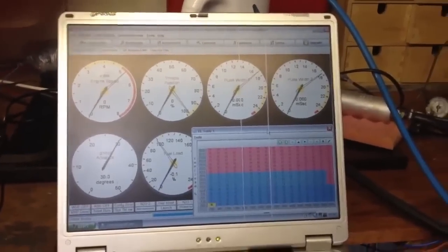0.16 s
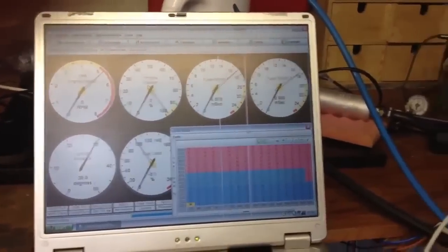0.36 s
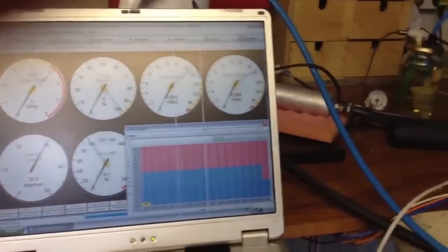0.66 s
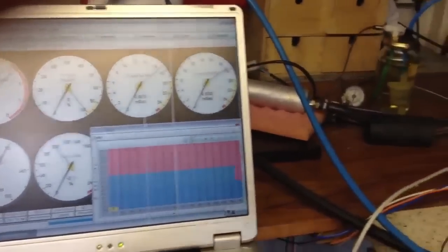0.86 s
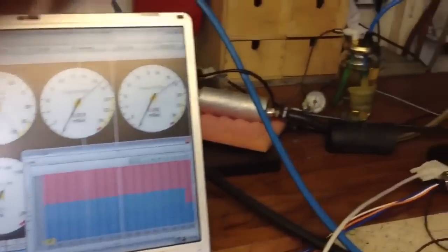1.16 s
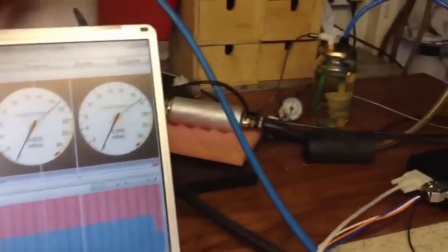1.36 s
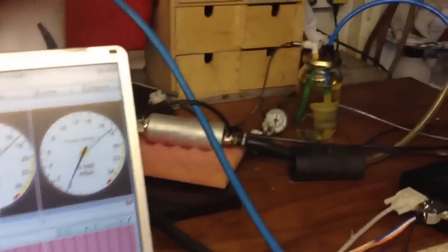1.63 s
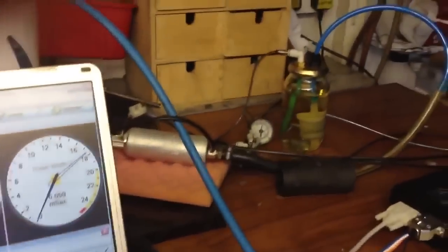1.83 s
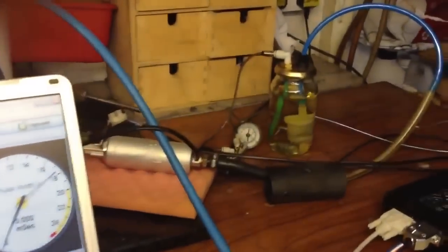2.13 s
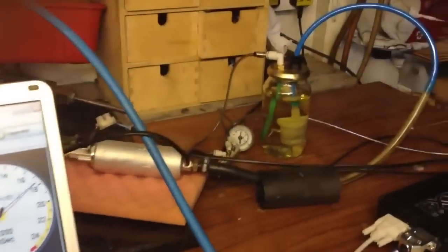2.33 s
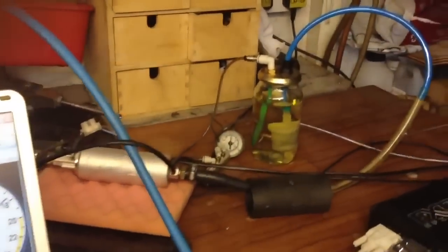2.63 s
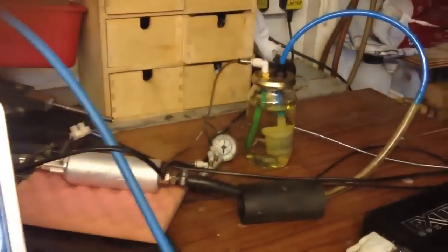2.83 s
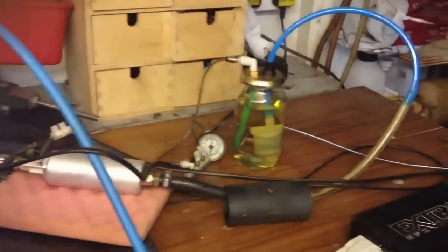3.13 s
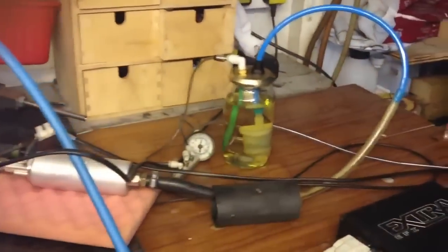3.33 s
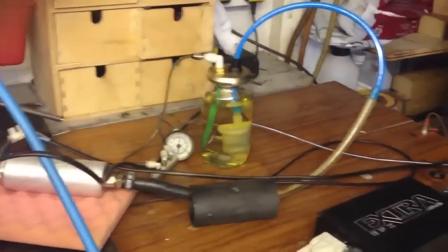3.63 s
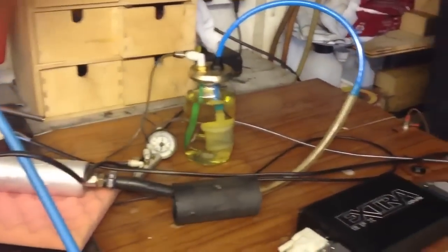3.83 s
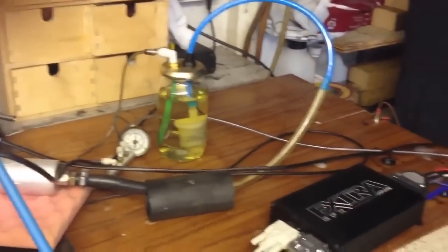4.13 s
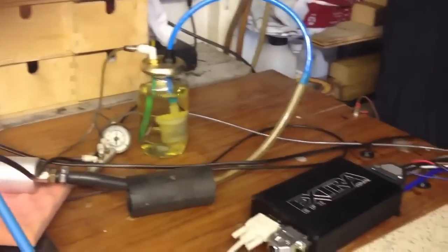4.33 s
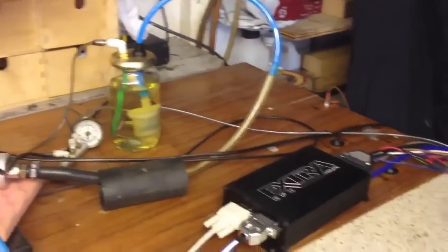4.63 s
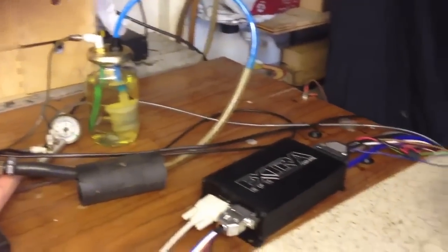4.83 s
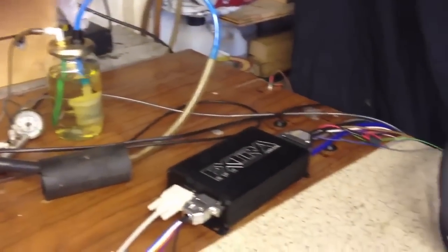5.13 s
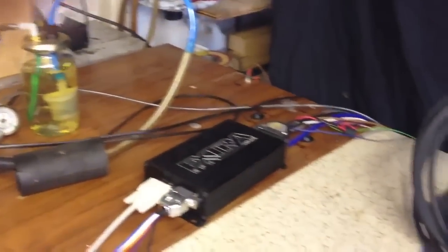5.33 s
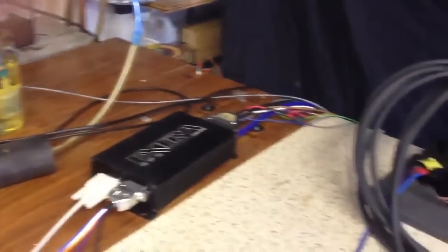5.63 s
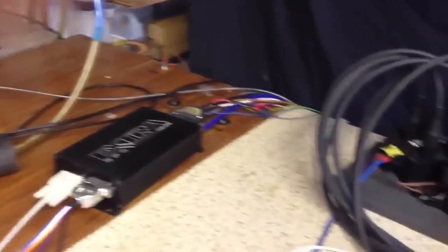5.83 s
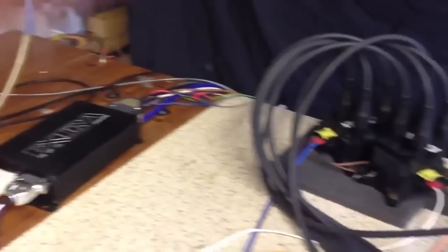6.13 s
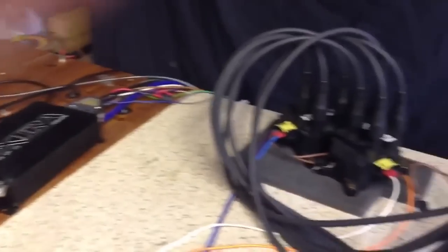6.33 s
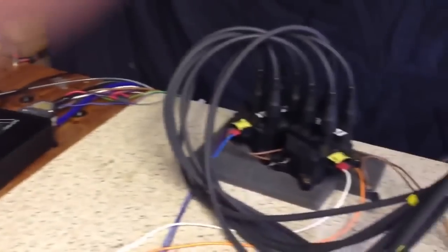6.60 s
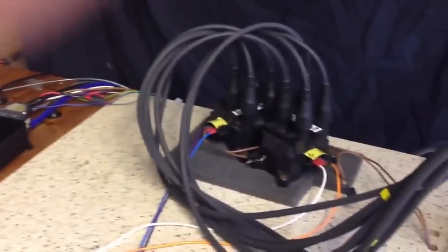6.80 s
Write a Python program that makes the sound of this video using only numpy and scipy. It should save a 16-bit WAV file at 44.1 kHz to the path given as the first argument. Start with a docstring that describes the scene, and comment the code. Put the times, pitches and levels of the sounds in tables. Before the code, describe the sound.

A small electric fuel pump runs without pause on a workshop bench. A thin, slightly wavering high whine sits with a rough, bright hiss of brushes and fuel. The whine stutters briefly early on, strengthens, then fades behind the hiss. Faint hum, a throbbing low drone and soft room rush lie underneath, with two dull bumps. A small handheld microphone drifts past at close range, in a short, cluttered room echo.

```python
"""A high whine and a rough hiss stand out: a small electric fuel pump running on a workshop bench.
Its shaft turns about 105 times a second; eight commutator segments make the whine as harmonics
and chop the noise of brushes and fuel into a rough hiss. The turning parts add a faint rattle.
The microphone drifts slowly past, so parts of the sound swell and fade; echoes color them.
Underneath lie mains hum, a throbbing drone, the low rush of the room and two soft bumps."""
import sys
import numpy as np
from scipy import signal
from scipy.fft import rfft, irfft
from scipy.io import wavfile

SR = 44100
rng = np.random.default_rng(int(sys.argv[2]) if len(sys.argv) > 2 else 0)


def persist_wave(psi):
    """Save psi, clipped to +-1, as 16-bit WAV."""
    counts = np.round(np.clip(psi, -1, 1) * 32767).astype(np.int16)
    wavfile.write(sys.argv[1], SR, np.atleast_2d(counts).T)


N = 306936
T = np.arange(N) / SR  # time of each sample, s
BINS = np.fft.rfftfreq(N, 1 / SR)  # frequencies of the spectrum, Hz

# Trend of the shaft speed, with stumbles under the load: (t/s, speed/turns per s)
SHAFT_SPEED = [(0, 105.4), (0.2, 104.1), (0.95, 104.7), (1.12, 103.4), (1.22, 105.9), (1.35, 104.7),
               (2.5, 104.6), (3.92, 105.4), (4.01, 103.6), (4.11, 105.4), (4.48, 104.2), (4.65, 104.9),
               (6.6, 105.3), (6.68, 104.2), (6.82, 106.0), (6.96, 104.7)]
# Main whine, at twice the segment rate, before the effect of speed: (t/s, level/dB)
WHINE_LEVEL = [(0, -47), (0.9, -51.5), (1.15, -50), (1.23, -47.5), (1.36, -52.5), (1.55, -51.5),
               (1.73, -45), (2.1, -43), (3.05, -48), (3.16, -53.5), (3.5, -56.5), (3.64, -49),
               (3.93, -48.5), (3.98, -59), (4.3, -59), (5.75, -61), (6.2, -53.5), (6.96, -52)]
# The commutator's other harmonics: multiples of the segment rate
SEGMENT_MULTIPLES = [1, 3, 4, 5, 7, 8]
# Beam and echo of each of those harmonics, in the same order, before a small trim and flutter:
# (level outside the beam/dB, swell/dB, crossed at t/s, approach/s, retreat/s,
#  echo level/dB, first node at t/s, time between nodes/s); a negative swell is a quiet zone
HARMONIC_BEAMS = [(-64.5, -20, 0.38, 3.0, 0.45, -75, 2.14, 3.15),
                  (-53, -10.5, 2.3, 2.7, 0.82, -71, 0.25, 1.43),
                  (-61, 10.5, 3.47, 0.44, 2.05, -73, 1.11, 1.52),
                  (-55, 11.5, 5.9, 1.25, 0.58, -65, 1.21, 1.59), (-52.5, -15, 2, 0.4, 3.1, -63, 0.7, 2.1),
                  (-56.5, -7, 5.6, 0.65, 0.81, -63, 1.1, 1.09)]
# Further lines, some of them higher commutator harmonics: (multiple of the shaft speed, level/dB)
SHAFT_ORDERS = [(4, -68.5), (9, -82), (13, -68), (15, -72), (17, -74), (18, -78), (20, -70.5), (25, -66),
                (33, -80), (39, -67), (41, -76), (48, -61.5), (72, -62), (80, -62)]

# Beams of the five hiss layers, before spurt and brush contact:
# (level outside the beam/dB, swell/dB, crossed at t/s, approach/s, retreat/s)
FLOW_BEAM = (-54.0, 2.5, 1.9, 0.6, 3.5)
BUZZ_BEAM = (-56.5, 9.5, 5, 2.5, 1.9)
RASP_BEAM = (-46.5, 2.5, 3, 1, 2.5)
RING_BEAM = (-53, 9, 2.5, 1.67, 3)
FIZZ_BEAM = (-55.5, 10, 4.5, 3.5, 3.5)
# Spectrum shapes of the same five layers, before the casing: (f/Hz, relative level per Hz/dB)
FLOW_SPECTRUM = [(500, -25.5), (800, -2), (1150, -6.5), (1450, 2), (1850, 1), (2400, 0), (2650, 1),
                 (2950, -5), (3400, 2), (4500, -25), (8000, -40.5)]
BUZZ_SPECTRUM = [(2200, -19), (2850, -14), (3100, -9.5), (3400, -1.5), (3800, -1), (4100, 3.5), (4450, 4.5),
                 (4900, 3), (6000, -37)]
RASP_SPECTRUM = [(1000, -40), (3600, -14), (4000, -6.5), (4300, -1), (4550, -8.5), (4900, -2), (5350, -4.5),
                 (5900, 0), (6800, -3), (7600, -4.5), (9000, -32), (12000, -23)]
RING_SPECTRUM = [(4000, -36.5), (6300, -11), (7200, -6.5), (7900, 0), (8600, -2), (9400, -3.5),
                 (9700, -11.5), (11500, -21)]
FIZZ_SPECTRUM = [(5000, -36), (8500, 4.5), (10000, 8), (11300, 2), (12500, 3), (14000, 4), (15000, 9),
                 (16000, -10)]
# Resonances and dips of the pump casing: (f/Hz, width/Hz, level added to the hiss/dB)
CASING_RESONANCES = [(1372, 75, 8), (1406, 68, -4.5), (2397, 170, 4), (4225, 200, -0.5), (4850, 100, 4),
                     (5060, 160, -1), (5700, 140, 3), (6330, 370, -3.5), (6500, 240, 4.5), (7660, 1200, -1),
                     (8730, 250, 0.5), (10050, 300, 0.5)]
# Spectrum shape of the rattle: (f/Hz, relative level per Hz/dB)
RATTLE_SPECTRUM = [(100, -24), (400, -23), (900, -7), (1300, -5.5), (1600, -11), (2500, -1.0),
                   (3000, -7), (3800, 1), (4600, 11), (7000, 17), (12000, -2)]

# Band of hiss and rattle weakened by the echo off the bench: (t/s, f/Hz, depth/0-1)
BENCH_NOTCH = [(0, 3150, 0.27), (1.9, 3680, 0.05), (2.5, 6000, 0.1), (3.2, 5930, 0.5), (4.3, 6200, 0.23),
               (4.8, 7060, 0.5), (6.96, 7750, 0.14)]
# Band strengthened by that echo: (t/s, f/Hz, added share of amplitude)
BENCH_PEAK = [(0, 6400, 0.66), (1.1, 6000, 0.28), (1.4, 8240, 0.19), (2.6, 7850, 0.88), (3.3, 7720, 0.98),
              (4.5, 7930, 0.18), (5.7, 8460, 0.99), (6.96, 8500, 0.05)]

# Soft bumps: (t/s, peak level of the envelope/dB)
BUMP_TIMES = [(2.96, -60), (4.31, -61)]
# Low rush of the room, with a brief swell: (t/s, level/dB)
RUSH_LEVEL = [(0, -64), (0.9, -61), (1.45, -56.5), (1.85, -60.5), (6.96, -61.5)]
# Spectrum shape of that rush: (f/Hz, relative level per Hz/dB)
ROOM_SPECTRUM = [(20, -34), (60, -45), (110, -10.5), (150, -9), (190, 1), (260, 0), (320, 3.5), (420, 0),
                 (540, 0), (640, -8), (1000, -7.5), (2000, -21)]
# Hum of the bench equipment: (f/Hz, level/dB)
HUM_LINES = [(100, -79), (186, -81.5), (300, -70), (399.6, -71.5), (449.5, -83), (499.6, -71.5)]

SEGMENTS = 8  # on the commutator
HUNT_TURNS_PER_S, HUNT_HZ = 0.3314, 4.0  # the motor hunts around its trend: rms amount, average rate
WHINE_DB_PER_TURN = 1.5  # on the flank of a resonance, each turn a second faster makes the whine louder
SCATTER_DB, SCATTER_HZ = -60.5, 15  # copy of the whine scattered by the room: level, flutter rate
FLUTTER_DB, FLUTTER_HZ = 1.0, 12  # chance flutter of the other harmonics: rms depth, rate
# The main whine stutters as the motor recovers from a stumble: center, half-length, rate, depth
STUTTER_AT_S, STUTTER_S, STUTTER_PER_S, STUTTER_DEPTH = 1.262, 0.16, 17.3, 0.99
SPURT_AT_S, SPURT_S, SPURT_DB = 4.63, 0.038, 5.5  # brief spurt in the flow of fuel
EDGE_HZ = 15450  # upper limit of the rattle and of the recorder


def motor_speed():
    """Turns a second: the load sets the trend, and the motor hunts unevenly around it with fine jitter."""
    hunt_depth = 1 + 0.396 * wander(rate_hz=1.508)
    hunt_cycles = HUNT_HZ * T + 0.3 * wander(rate_hz=1.5)
    hunt = hunt_depth * np.sin(2 * np.pi * hunt_cycles)
    jitter = 0.071 * wander(rate_hz=33.6)
    return follow(SHAFT_SPEED)[0] + HUNT_TURNS_PER_S * evened(hunt) + jitter


def whine(shaft, speed, trim_db=-0.07):
    """Commutator harmonics, plus further lines at multiples of the shaft speed, some also harmonics."""
    segment = SEGMENTS * shaft
    main_db = follow(WHINE_LEVEL)[0] + WHINE_DB_PER_TURN * (speed - speed.mean())
    main = stutter() * harmonic(2 * segment, main_db, unrest=0.14, rate_hz=36)
    others = 0
    for multiple, row in zip(SEGMENT_MULTIPLES, HARMONIC_BEAMS):
        level_db = trim_db + standing_wave(*row) + FLUTTER_DB * wander(FLUTTER_HZ)
        others = others + tone(multiple * segment, level_db, unrest=0.18, rate_hz=25)
    orders = sum(tone(order * shaft, db, unrest=0.81, rate_hz=4.5) for order, db in SHAFT_ORDERS)
    return main + others + orders


def harmonic(turns, db, unrest, rate_hz):
    """The direct whine beats with its scattered copy, so it flutters most when it is weak."""
    flutter = wander(SCATTER_HZ) + 1j * wander(SCATTER_HZ)
    scattered = flutter * np.exp(2j * np.pi * turns)
    return tone(turns, db, unrest, rate_hz) + gain_of(SCATTER_DB) * scattered.real


def stutter():
    """A brief run of evenly spaced dropouts, as a gain."""
    gaps = np.cos(np.pi * STUTTER_PER_S * (T - STUTTER_AT_S)) ** 4
    return 1 - np.clip(STUTTER_DEPTH, 0, 1) * bell(STUTTER_AT_S, STUTTER_S, STUTTER_S) * gaps


def standing_wave(outside_db, swell_db, at_s, approach_s, retreat_s, echo_db, node_s, spacing_s):
    """Level in dB as a beam and its echo cancel and reinforce in turn along the microphone's path."""
    direct = gain_of(beam(outside_db, swell_db, at_s, approach_s, retreat_s))
    echo = gain_of(echo_db) * np.exp(2j * np.pi * (T - node_s) / spacing_s)
    return 20 * np.log10(abs(direct - echo) + 1e-9)


def brushes(shaft):
    """Noise of brushes and fuel, chopped by each segment and a little by each turn, ringing in the casing."""
    angle = 2 * np.pi * shaft
    segment_chop_db = 1.7 * np.cos(SEGMENTS * angle) + 0.55 * np.cos(2 * SEGMENTS * angle)
    turn_chop_db = 0.53 * np.cos(angle) + 0.17 * np.cos(2 * angle)
    chop = gain_of(segment_chop_db + turn_chop_db + 0.39 * wander(rate_hz=19))
    casing_db = sum(db / (1 + (2 * (BINS - hz) / width) ** 2) for hz, width, db in CASING_RESONANCES)
    spurt_db = SPURT_DB * bell(SPURT_AT_S, SPURT_S, SPURT_S)
    contact = wander(rate_hz=24)  # uneven brush contact shows most in the top of the hiss
    layers = [(beam(*FLOW_BEAM) + spurt_db, FLOW_SPECTRUM),
              (beam(*BUZZ_BEAM), BUZZ_SPECTRUM),
              (beam(*RASP_BEAM), RASP_SPECTRUM),
              (beam(*RING_BEAM) + 0.13 * contact, RING_SPECTRUM),
              (beam(*FIZZ_BEAM) + 0.86 * contact, FIZZ_SPECTRUM)]
    hiss = 0
    for db, spectrum in layers:
        chopped = chop * rng.standard_normal(N)
        hiss = hiss + gain_of(db) * coloured(chopped, spectrum, casing_db)
    return hiss


def rattle(shaft, size=1024, db=-54.0):
    """Each turn repeats the same scrapes of rotor and bearings: faint lines at multiples of shaft speed."""
    hz = np.arange(size // 2 + 1) * np.mean(np.diff(shaft)) * SR
    random_phases = np.exp(2j * np.pi * rng.random(len(hz)))
    one_turn = irfft(random_phases * (hz < EDGE_HZ))
    scrape = np.interp(shaft % 1, np.arange(size) / size, one_turn, period=1)
    return gain_of(db) * coloured(scrape, RATTLE_SPECTRUM)


def beam(outside_db, swell_db, at_s, approach_s, retreat_s):
    """Level in dB while the microphone crosses one beam of the pump's sound."""
    return outside_db + swell_db * bell(at_s, approach_s, retreat_s)


def bench_echo(x):
    """The bench's echo weakens one band and strengthens another; both slide as the microphone moves."""
    notch_hz, depth = follow(BENCH_NOTCH)
    peak_hz, boost = follow(BENCH_PEAK)
    notch = np.clip(depth, 0, 1) * sliding_band(x, notch_hz, width_hz=1020)
    return x - notch + boost * sliding_band(x, peak_hz, width_hz=450)


def sliding_band(x, hz, width_hz):
    """A resonance that follows the curve hz: shift it to zero, smooth, shift back."""
    turn = np.exp(2j * np.pi * np.cumsum(hz) / SR)
    r = np.exp(-np.pi * width_hz / SR)
    return 2 * (turn * signal.lfilter([1 - r], [1, -r], x / turn)).real


def clutter(x, strength=0.14, drift_s=.00005, count=6):
    """Echoes off nearby objects; their paths change as the hand moves, so fine ripples slide along."""
    echoes = 0
    for delay_s in rng.uniform(0.000984, .007, count):
        moving_delay = delay_s + drift_s * wander(rate_hz=0.37)
        echoes = echoes + np.interp(T - moving_delay, T, x, left=0)
    return x + strength * echoes


def reflections(x, t60_s=0.071, drift_s=0.000297):
    """Short, dense echoes from the cluttered walls; their delay drifts as the microphone moves."""
    t = T[:SR // 3]
    taps = rng.standard_normal(len(t)) * gain_of(-60 * t / t60_s) * (t > .003)
    wet = signal.fftconvolve(x, taps / np.linalg.norm(taps))[:N]
    return np.interp(T - drift_s * wander(rate_hz=0.519), T, wet, left=0, right=0)


def bumps(hz=165, rise_s=0.012):
    """Dull knocks: a low tone swells quickly and dies away within about a tenth of a second."""
    total = 0
    for start_s, db in BUMP_TIMES:
        age = np.maximum(T - start_s, 0)
        envelope = age / rise_s * np.exp(1 - age / rise_s)
        total = total + gain_of(db) * envelope * np.sin(2 * np.pi * hz * age)
    return total


def workshop(throb_hz=4.2):
    """Low rush, gently wavering hum and a drone near 225 Hz that throbs a few times a second."""
    rush = gain_of(follow(RUSH_LEVEL)[0]) * coloured(rng.standard_normal(N), ROOM_SPECTRUM)
    hum = sum(tone(hz * T, db, unrest=0.36, rate_hz=1.8) for hz, db in HUM_LINES)
    throb_cycles = throb_hz * T + 0.31 * wander(rate_hz=1.33)
    throb = 1 + 0.58 * np.cos(2 * np.pi * throb_cycles)
    drone_turns = 224.5 * T + 0.15 * wander(rate_hz=5.5)
    drone = throb * tone(drone_turns, -69.5, unrest=0.17, rate_hz=3.7)
    return rush + hum + drone


def tone(turns, db, unrest, rate_hz):
    """A line of given rms level whose strength and phase flutter; turns counts its cycles."""
    flutter = 1 + unrest * (wander(rate_hz) + 1j * wander(rate_hz))
    wave = flutter * np.exp(2j * np.pi * (turns + rng.random()))
    return gain_of(db) * evened(wave.real)


def coloured(x, points, extra_db=0):
    """Gives x a spectrum, at an rms of one."""
    hz, db = np.transpose(points)
    shape_db = np.interp(np.log(BINS + 1), np.log(hz), db) + extra_db
    return evened(irfft(rfft(x) * gain_of(shape_db), N))


def wander(rate_hz):
    """Smooth chance movement up to about this rate, at an rms of one."""
    smoothing = 1 + (BINS / rate_hz) ** 4
    return evened(irfft(rfft(rng.standard_normal(N)) / smoothing, N))


def bell(at_s, approach_s, retreat_s):
    """Rises smoothly to one at a moment and falls away again."""
    side_s = np.where(T < at_s, approach_s, retreat_s)
    return np.exp(-((T - at_s) / side_s) ** 2)


def follow(rows):
    """Each column of a curve, at every sample."""
    s, *columns = np.transpose(rows)
    return [np.interp(T, s, column) for column in columns]


def evened(x):
    """Scales to an rms of one."""
    return x / np.sqrt(np.mean(x ** 2) + 1e-20)


def gain_of(db):
    """Decibels to amplitude."""
    return 10 ** (np.asarray(db) / 20)


def scene():
    """One turning shaft drives the pump's sounds; the room adds its own, and both channels are alike."""
    speed = motor_speed()
    shaft = np.cumsum(speed) / SR  # turns so far
    rough_sound = rattle(shaft) + brushes(shaft)
    pump = whine(shaft, speed) + clutter(bench_echo(rough_sound))
    mono = pump + gain_of(-14.5) * reflections(pump) + workshop() + bumps()
    return np.array([mono, mono])


def record(dry):
    """The small microphone's bass roll-off and the recorder's upper band limit."""
    bass_cut = signal.butter(3, 72, "highpass", fs=SR, output="sos")
    thin = signal.sosfilt(bass_cut, dry)
    band_limit = signal.firwin(1023, EDGE_HZ, window=("kaiser", 9), fs=SR)
    return signal.oaconvolve(thin, band_limit[None], "same")


dry = scene()
out = record(dry)
persist_wave(out)
```